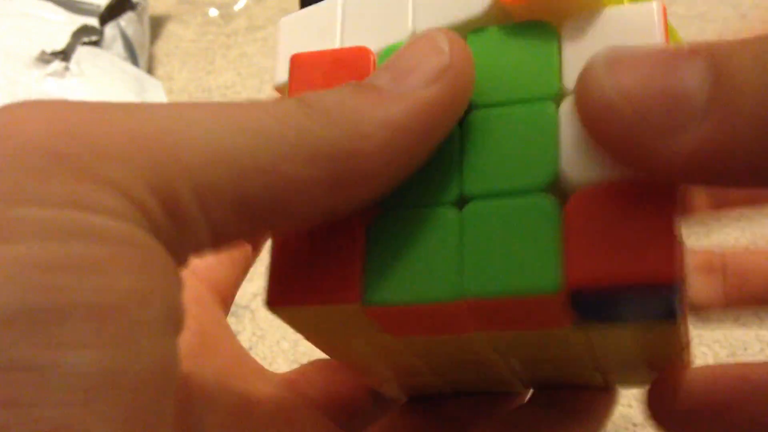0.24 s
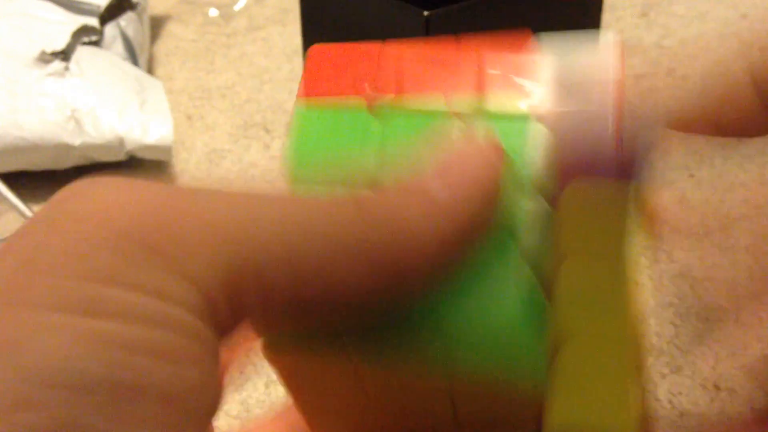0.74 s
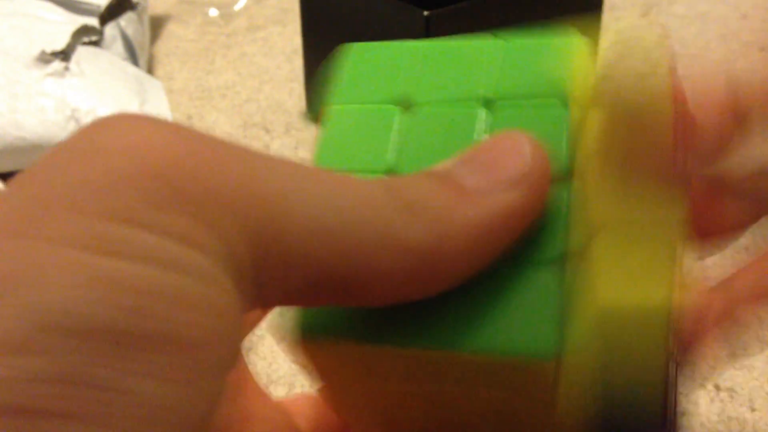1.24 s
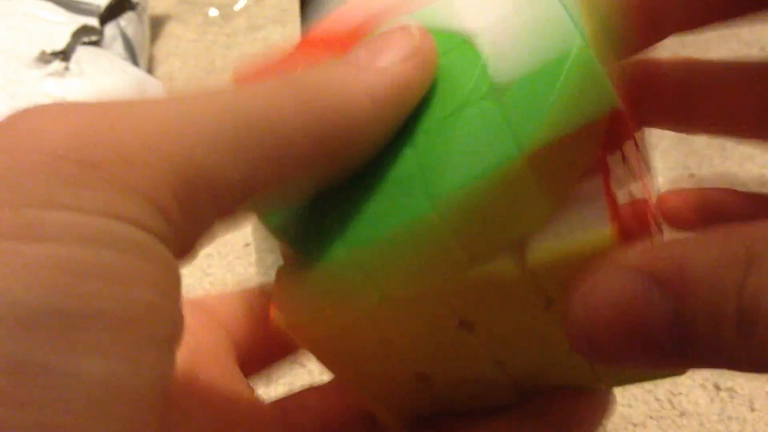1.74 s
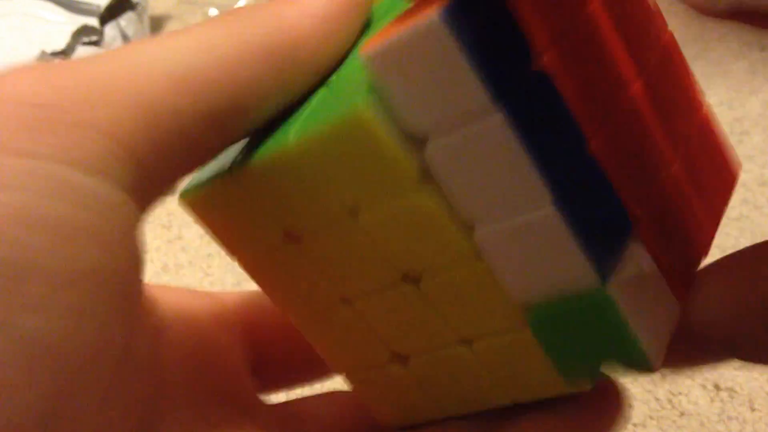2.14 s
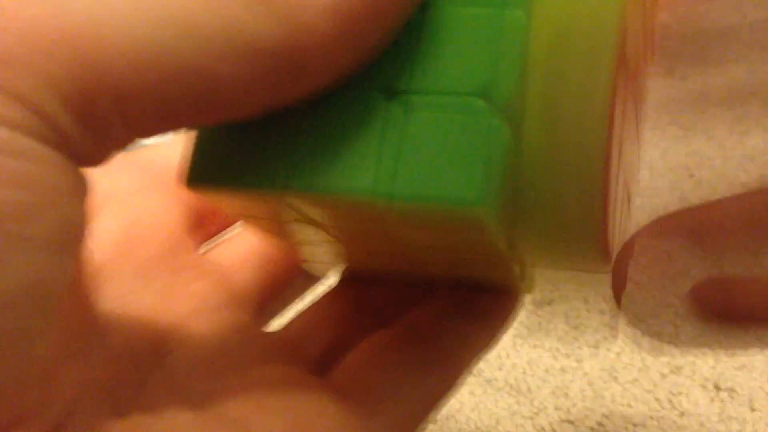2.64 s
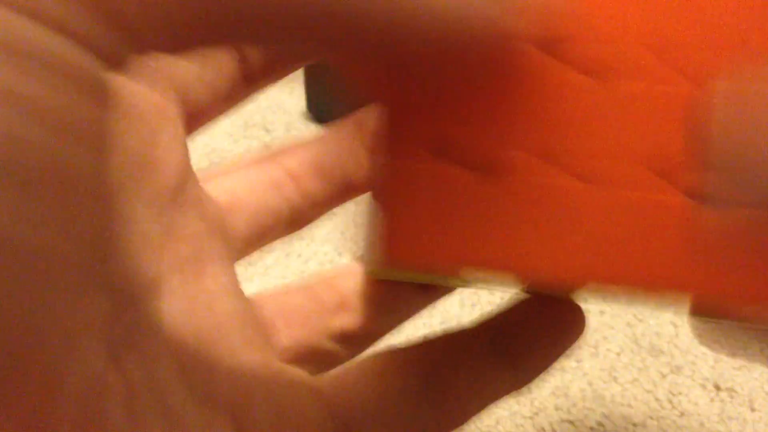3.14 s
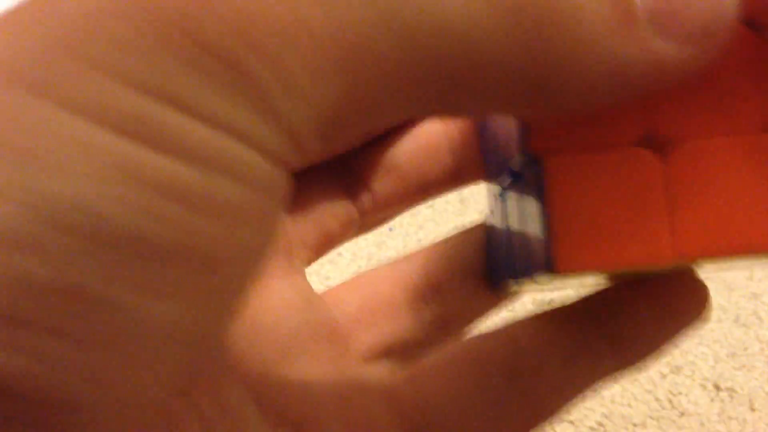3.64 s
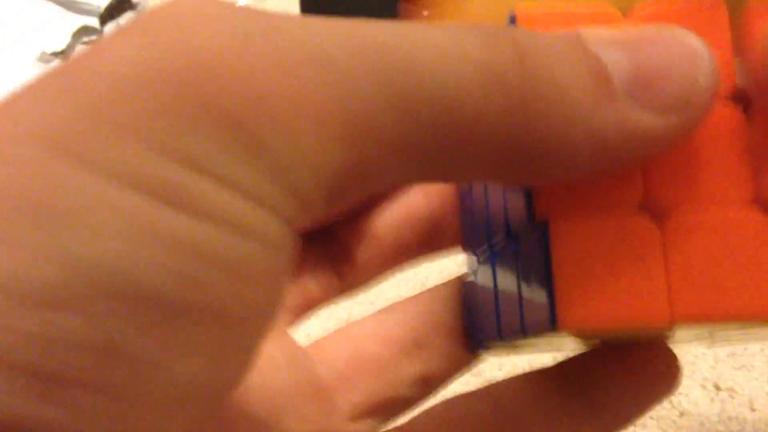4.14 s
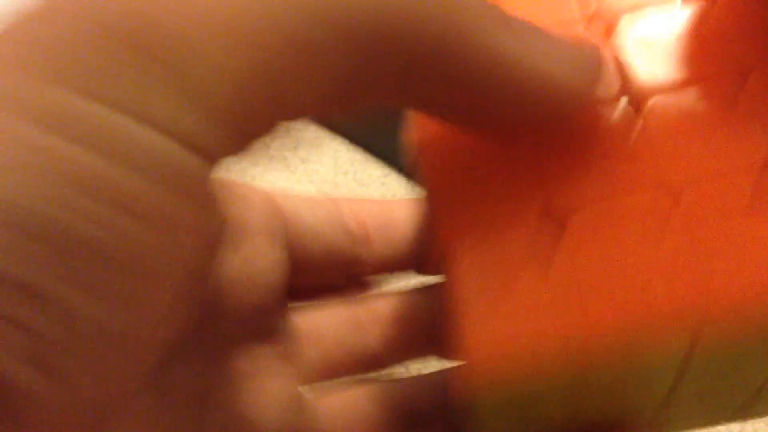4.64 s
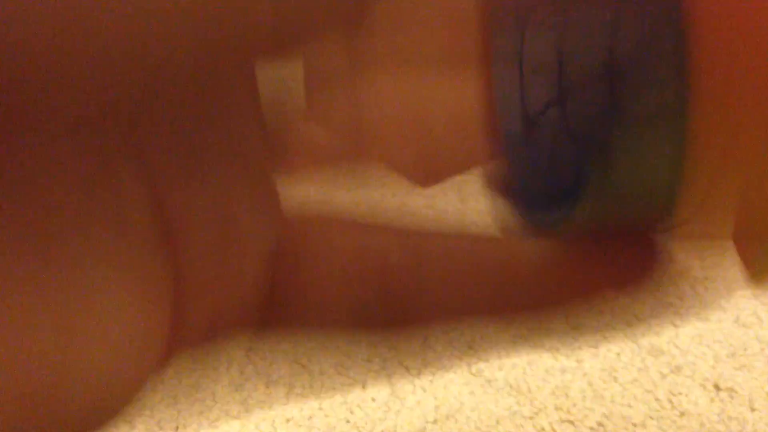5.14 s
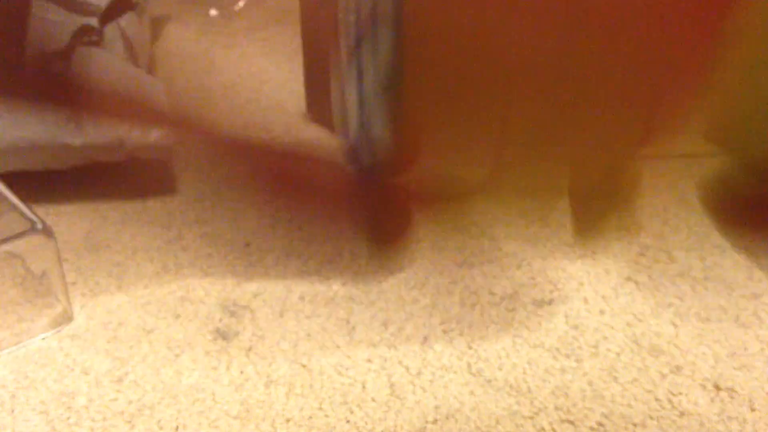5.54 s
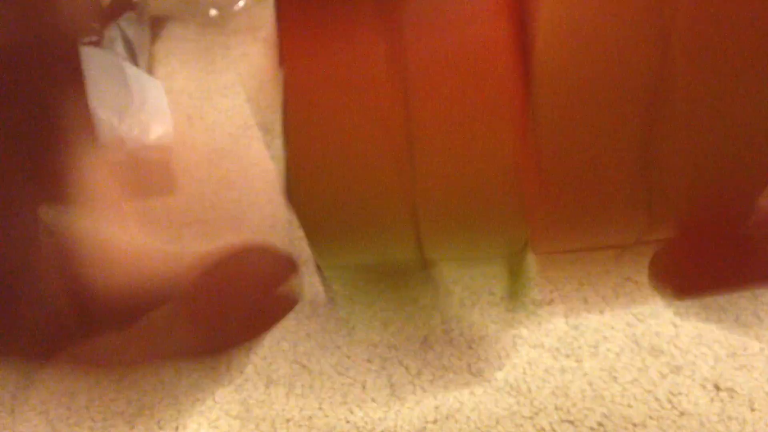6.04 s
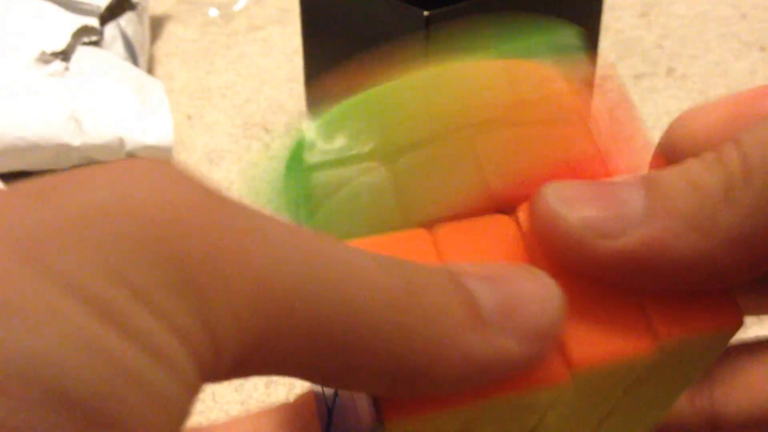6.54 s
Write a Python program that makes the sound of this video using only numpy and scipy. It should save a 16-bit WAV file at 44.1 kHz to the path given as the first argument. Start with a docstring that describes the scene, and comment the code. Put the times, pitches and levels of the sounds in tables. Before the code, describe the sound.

Dry, hollow clicks and short gritty rubs come from a handheld puzzle cube at close range. Quick irregular twists give way to near quiet, broken by a sharp snap and spaced turns. The turning then becomes heavy, crowded and loudest before easing into a few light clicks. The small indoor space adds little echo, only a very faint low hum, rumble and soft hiss.

```python
"""A plastic puzzle cube is twisted by hand close to the microphone in a carpeted room, for 6.8 seconds.
Brisk turns come first and thin out to faint nudges near 3 s; a hard snap at 3.4 s opens a run of spaced
turns, the loudest and densest turning fills 5.2 to 6.3 s, and a few small turns end the scene.
Each turn is friction noise through resonances, with clicks made of decaying shell modes and edge noise.
Throughout, a mains hum and two fan tones (wavering sines), rumble and hiss (shaped noise) lie underneath."""
import sys
import numpy as np
from scipy import signal
from scipy.fft import rfft, irfft, next_fast_len
from scipy.io import wavfile
from scipy.ndimage import map_coordinates

SR = 44100
rng = np.random.default_rng(int(sys.argv[2]) if len(sys.argv) > 2 else 0)


def log_audio(samples):
    """Write samples as a 16-bit WAV file to the path given in sys.argv[1]."""
    # one column per channel
    frames = np.atleast_2d(samples).T
    # limit to full scale, then quantise
    limited = np.clip(frames, -1, 1)
    pcm = np.round(limited * 32767).astype(np.int16)
    wavfile.write(sys.argv[1], SR, pcm)


N = 299859

# turns and nudges of a layer: (fastest moment [s], rise [s], fall [s], relative rubbing level [dB],
# relative brightness [dB], hollow pitch [Hz])
TURNS = [(0.049, 0.28, 0.043, -38, -6.5, 1930), (.21, 0.044, 0.042, -42, -7.5, 1820),
         (.335, 0.049, 0.05, -56.5, -7, 1800), (.38, 0.017, 0.014, -50.5, -8, 1730),
         (.408, .01, 0.014, -59, -12, 1800), (.435, 0.04, 0.027, -54, -8, 1830),
         (.487, 0.023, 0.036, -51, -8, 1580), (.57, 0.024, 0.016, -54.5, -13, 1800),
         (.61, 0.034, 0.037, -48, -5.5, 1890), (.662, 0.018, 0.022, -37.5, -9, 2000),
         (.7, 0.027, 0.038, -38, -6.5, 2050), (0.819, .11, 0.084, -37, -5, 1980),
         (0.949, 0.047, 0.085, -48, -11.5, 1874), (1.02, 0.043, 0.031, -54.5, -4, 1790),
         (1.085, 0.038, 0.045, -41, -6, 1970), (1.25, 0.062, 0.092, -49.5, -7.5, 1903),
         (1.317, 0.032, 0.022, -38.5, -4.5, 1880), (1.359, 0.03, 0.036, -46, -8, 1950),
         (1.441, 0.048, 0.048, -38, -4.5, 1890), (1.495, 0.025, 0.036, -43, -8.5, 1880),
         (1.781, 0.043, 0.039, -43, -8.5, 1752), (1.846, .02, 0.028, -45.5, -10.5, 1930),
         (1.911, 0.034, 0.019, -50.5, -8, 1814), (1.965, 0.015, 0.016, -39, -6, 2010),
         (2.03, 0.13, 0.081, -56.5, -10, 1720), (2.157, 0.057, 0.04, -47.5, -6, 1675),
         (2.32, 0.079, 0.078, -33, -6, 1807), (2.41, .02, 0.038, -48.5, -5, 1480),
         (2.705, 0.047, 0.05, -40, -10, 1850), (2.94, 0.072, 0.056, -57, -9, 1630),
         (3.15, 0.17, .14, -66, -11, 1420), (3.37, 0.047, 0.055, -53.5, -21, 1650),
         (3.43, 0.026, .04, -27, -2.5, 1790), (3.51, 0.025, .05, -59.5, -16, 1600),
         (3.64, 0.021, 0.025, -52.5, -14, 1488), (3.69, 0.03, 0.027, -39.5, -2.5, 1643),
         (3.81, .015, 0.018, -53, -3.5, 1650), (3.934, 0.046, 0.067, -37, -3.5, 1656),
         (4.095, 0.011, 0.018, -49.5, -7, 1600), (4.203, 0.042, 0.053, -34.5, -1.5, 1610),
         (4.356, 0.014, .02, -53.5, -7, 1610), (4.47, 0.046, 0.061, -33.5, -3, 1783),
         (4.63, 0.014, 0.035, -57.5, -1, 1460), (4.95, 0.085, 0.082, -44, -6.5, 1826),
         (5.04, 0.078, .06, -54, -7, 1700), (5.23, .11, 0.087, -34, -8.5, 1605),
         (5.3, .03, .025, -49, -8, 1565), (5.441, 0.066, 0.084, -28, -7, 1503),
         (5.652, .1, 0.05, -29, -5.5, 1487), (5.781, 0.073, 0.064, -27.5, -8.5, 1495),
         (5.87, 0.032, 0.029, -32.5, -2, 1520), (5.93, 0.057, 0.037, -26.5, -1.5, 1531),
         (6.045, 0.074, .04, -31.5, -5.5, 1563), (6.125, 0.032, 0.052, -30, -3, 1715),
         (6.175, 0.028, .025, -41, -4, 1610), (6.254, 0.044, .05, -38, -4.5, 1834),
         (6.53, 0.033, .03, -46, -7, 1948), (6.575, 0.048, 0.028, -42.5, -6.5, 1965),
         (6.635, 0.049, 0.031, -38, -4.5, 2020), (6.73, 0.037, 0.053, -55.5, -3.5, 1854)]
# clearest knocks of the pieces: (time [s], relative peak level [dB], edge crack relative to the ring [dB])
CLEAR_KNOCKS = [(0.01, -32, -7), (0.0537, -17.5, -18), (0.0697, -22, -21), (0.187, -26.5, -16),
                (0.2075, -29, -8), (0.2309, -29, -19), (0.3152, -38, -16), (0.381, -30.5, -21),
                (0.4299, -33, -18), (0.4828, -32, -14), (0.5132, -35.5, -17), (0.5663, -44, -15),
                (0.5955, -38, -20), (0.605, -20.5, -24), (0.633, -22, -19), (0.6537, -30.5, -11),
                (0.6929, -17, -9.5), (0.7068, -19, -24), (0.741, -28, -19), (0.7612, -25, -20),
                (0.7735, -21, -17), (0.7896, -20.5, -16), (0.8152, -22, -23), (0.828, -21, -18),
                (0.8415, -20.5, -15), (0.8547, -23.5, -14), (0.8673, -23.5, -12), (0.9333, -29.5, -23),
                (0.9846, -21, -15), (1.068, -23.5, -16), (1.0853, -28, -14), (1.1114, -30, -9),
                (1.1645, -40.5, -15), (1.2184, -31.5, -14.5), (1.2627, -25.5, -20.5), (1.3139, -14, -31),
                (1.4027, -24.5, -17), (1.4247, -32, -12), (1.4315, -32, -20), (1.4361, -22.5, -19),
                (1.4516, -21.5, -16), (1.4964, -35, -26), (1.5224, -32, -14), (1.7347, -37.5, -12.5),
                (1.7641, -30.5, -11), (1.7834, -26.5, -10.5), (1.8432, -28, -8), (1.9555, -26, -19),
                (1.9639, -23.5, -11.5), (2.0654, -35, -28), (2.1204, -30, -16.5), (2.2557, -23.5, -27),
                (2.276, -21, -24), (2.3017, -12.5, -9), (2.3104, -10.5, -7), (2.3236, -11, -7),
                (2.3284, -12.5, -6), (2.3401, -13, -11), (2.354, -19, -12), (2.36, -18, -15),
                (2.413, -27.5, -12), (2.4824, -41, -26), (2.679, -29, -17), (2.7062, -8.5, -15),
                (2.7392, -32, -13.5), (2.8927, -44, -14), (2.9494, -35, -19), (3.053, -42.5, -18),
                (3.1117, -39, -24), (3.1764, -40.5, -17), (3.209, -41, -14.5), (3.2992, -30.5, -26),
                (3.3568, -43, -18), (3.3616, -34, -24), (3.3853, -32, -21), (3.4123, -22.5, 2),
                (3.4189, -9.5, -9), (3.4242, -12, -9), (3.4362, -6.5, -10.5), (3.4584, -30, -15),
                (3.63, -41, -16), (3.663, -22, -18.5), (3.6923, -21.5, -16), (3.7768, -44, -27),
                (3.8005, -36.5, -18), (3.8843, -28.5, -15), (3.9004, -32, -11), (3.909, -25, -6),
                (3.9428, -17.5, -6.5), (3.9612, -31, -3), (4.0828, -32.5, -9), (4.0921, -29.5, -21),
                (4.1602, -25, -12), (4.1756, -22.5, -12), (4.1877, -20.5, -8.5), (4.2247, -23.5, -2.5),
                (4.2617, -29.5, -19), (4.345, -27.5, -15.5), (4.3666, -41, -9), (4.4233, -20.5, -9.5),
                (4.4506, -18, -2), (4.4624, -17.5, -8), (4.4743, -15, -6.5), (4.5145, -22, -14),
                (4.6173, -39, -11), (4.625, -32.5, -9.5), (4.7172, -35, -28), (4.7257, -33, -8.5),
                (4.819, -44, -20), (4.8778, -42, -19), (4.8978, -36, -17), (4.9208, -35, -21),
                (4.9386, -27, -24), (4.9659, -29.5, -12), (4.98, -32, -26), (5.0344, -33, -18),
                (5.1133, -36.5, -25), (5.133, -32.5, -23), (5.1511, -19, -23), (5.1693, -24, -28),
                (5.1944, -21, -19), (5.215, -20, -15.5), (5.257, -16.5, -17), (5.2751, -25, -18),
                (5.3549, -27.5, -9), (5.3654, -30, -10), (5.3856, -19, -16), (5.4006, -13.5, -22),
                (5.421, -20, -13), (5.4334, -23, -16), (5.459, -25, -11), (5.474, -18, -13),
                (5.5073, -19, -8.5), (5.5607, -36, -32), (5.5895, -17.5, -25), (5.5942, -15.5, -23),
                (5.6122, -20.5, -21), (5.6246, -15.5, -20), (5.6445, -11.5, -11), (5.659, -4.5, -12.5),
                (5.6727, -14.5, -9), (5.7114, -26, -16), (5.7251, -25, -13), (5.7287, -19.5, -17),
                (5.7478, -21, -10), (5.7603, -20, -6), (5.7667, -13.5, -12), (5.781, -8, -18),
                (5.7958, -17.5, -7), (5.8054, -19, -14), (5.826, -17, -8.5), (5.8541, -22, -10),
                (5.8737, -15, -12), (5.9005, -12, -12), (5.913, -11, -7.5), (5.934, -7.5, -11),
                (5.9424, -19, -14), (5.9477, -14.5, -6), (5.9906, -22, -12), (6.0258, -22, -5),
                (6.0439, -16, -20), (6.065, -17, -15), (6.11, -11.5, -11), (6.1292, -8.5, -15.5),
                (6.1454, -20, -15), (6.157, -22.5, -11), (6.1704, -19.5, -15), (6.2184, -25, -14),
                (6.2339, -22, -14), (6.2464, -20.5, -16), (6.2623, -26, -18), (6.5096, -39, -23),
                (6.57, -28, -9.5), (6.6209, -27, -23), (6.6462, -25, -16), (6.6842, -37, -19),
                (6.7311, -26, -9)]
# shell modes of a hollow piece: (ratio to the hollow pitch [1], relative level [dB], decay time t60 [s])
SHELL_MODES = [(.62, -12, 0.011), (.8, -12, 0.01), (1, -4, 0.013), (1.18, -10, 0.015), (1.5, -9.5, 0.015),
               (2, -15, 0.011)]
# colour of the hard edges through the microphone port: (frequency [Hz], relative level [dB])
EDGE_COLOUR = [(1760, -27), (3000, -4.5), (3940, -10), (4250, -6.5), (5140, -4), (6480, 0.5), (9490, -11.5),
               (10200, -16), (14600, -8), (15300, -11)]
# resonances of the whole cube cupped in the palms: (frequency [Hz], width [Hz], relative level [dB])
CUPPED_MODES = [(840, 110, -7.5), (1405, 180, -3), (2140, 236, -6.5), (3100, 840, -13)]
# resonances of the cube held by the fingertips: (frequency [Hz], width [Hz], relative level [dB])
OPEN_MODES = [(826, 377, -5.5), (1550, 143, 0.5), (2172, 113, 3), (2870, 550, -5.5)]
# weak bass of so small an object, and the octave favoured by the gap between the hands:
# (frequency [Hz], gain [dB])
HANDS_GAIN = [(60, -41), (200, -11), (350, -1.5), (600, -4), (800, -5), (1080, -3), (1250, -0.5),
              (2300, -2.5), (2600, -5.5), (4000, -2), (5000, -1)]
# decay of the carpeted room: (frequency [Hz], decay time t60 [s])
ROOM_DECAY = [(300, 0.71), (2000, 0.14), (10000, 0.3)]
# mains hum and two fan tones: (frequency [Hz], rms level [dB], wavering [dB])
HUM_TONES = [(121, -68.5, .5), (266.4, -70.5, 3), (780, -78, 1.5)]
# colour of the low rumble: (frequency [Hz], relative level [dB])
RUMBLE_COLOUR = [(25, -24), (60, 1), (80, 0.5), (160, 2), (250, 2.5), (300, -13), (400, -47)]
# colour of the room hiss: (frequency [Hz], relative level [dB])
HISS_COLOUR = [(200, -24), (300, -6.5), (420, -8), (600, -8), (720, -12.5), (900, -8.5), (1200, -8),
               (1600, -18), (2400, -9), (3300, -15.5), (6000, -22.5), (9800, -34), (15300, -22.5)]
# low-end roll-off and steep upper band limit: (frequency [Hz], gain [dB])
BAND_GAIN = [(20, -21), (50, -11), (70, -7.5), (110, 2), (15270, 0), (15340, -25), (16400, -37)]
TOP_HZ = 16480  # nothing passes from here up

# arc of a turn: drop at one rise or fall time from the fastest moment, exponents of the arc's two sides
FADE_DB, START_ROUNDNESS, STOP_ROUNDNESS = 25, 2.54, 3.62  # the layer stops more squarely
SETTLE_DB, SETTLE_DB_PER_S = -21, 257  # pieces settle after a turn: level relative to it, rate of decay
REST_DB = -71  # rubbing at rest, on the scale of the turns

RATTLE_GAP_S = 0.005  # median time between small knocks of the loose pieces
RATTLE_DB, RATTLE_SPREAD_DB = 8, 6  # knock level over the rubbing, and its scatter
RATTLE_CRACK_DB, CRACK_SPREAD_DB = -11, 5  # edge crack over the turn's brightness, and its scatter
PITCH_SPREAD = 0.12  # largest relative shift of a knock's pitch
CLEAR_S = 0.0035  # no rattle so close to a clear knock or its touch
TOUCH_S, TOUCH_DB = 0.0022, -10  # median lead of a corner's light touch, its mean level under the knock

# the top of the scrape gains an extra 0.35 dB per dB of brightness above the usual
SHEEN_HZ, SHEEN_GROWS, USUAL_BRIGHT_DB = 9050, 0.35, -5.5


def turning():
    """Hand motion as a control signal: each turn swells and fades in an arc; where turns overlap, powers add.

    Returns rubbing level [dB], brightness [dB] and hollow pitch [Hz] at every sample."""
    t = np.arange(0, N + 64, 64) / SR  # a coarse grid is enough for a hand
    fastest, rise, fall, db, bright_db, hz = np.transpose(TURNS)[:, :, None]
    before = t < fastest
    away = np.where(before, (fastest - t) / rise, (t - fastest) / fall)
    arc_db = db - FADE_DB * away ** np.where(before, START_ROUNDNESS, STOP_ROUNDNESS)
    settle_db = db + SETTLE_DB - SETTLE_DB_PER_S * np.maximum(t - fastest - fall, 0)
    power = amp(arc_db) ** 2 + (t > fastest) * amp(settle_db) ** 2
    # brightness and pitch are means weighted by power; the small term decides between turns
    share = power + 1e-9 / (1 + away) ** 4
    share = share / share.sum(0)
    level_db = 10 * np.log10(power.sum(0) + amp(REST_DB) ** 2)
    curves = level_db, (share * bright_db).sum(0), (share * hz).sum(0)
    return [np.interp(np.arange(N) / SR, t, curve) for curve in curves]


def rubbing(level_db, bright_db, hz, slips_per_s=500, spread_db=5.0, smooth=0.76):
    """Stick-slip friction: tiny slips between the layers, in clumps, excite the cube and its edges."""
    slips = (rng.random(N) < slips_per_s / SR) * amp(spread_db * rng.standard_normal(N))
    slip_decay = amp(-60 * np.arange(SR // 100) / SR / 0.0098)
    burst = signal.fftconvolve(slips, slip_decay)[:N]
    drag = unit((smooth + unit(burst)) * amp(1.82 * wobble(70)))
    body_drive, edge_drive = drag * rng.standard_normal((2, N))
    # the grip that raises the pitch of the knocks also opens the sound of the whole cube
    openness = np.clip((hz - 1500) / 500, 0, 1)
    cupped = np.sqrt(1 - openness) * resonant(body_drive, CUPPED_MODES)
    opened = np.sqrt(openness) * resonant(body_drive, OPEN_MODES)
    edge = signal.fftconvolve(edge_drive, causal(EDGE_COLOUR))[:N]
    sheen = filtered(edge, lambda f: f > SHEEN_HZ)
    sheen_gain = amp(SHEEN_GROWS * (bright_db - USUAL_BRIGHT_DB))
    edge = (edge + sheen * (sheen_gain - 1)) * amp(bright_db + 1.14)
    return amp(level_db - 4.0) * (cupped + opened + edge)


def knocks(level_db, bright_db, hz):
    """Impacts as a point process: clear knocks, their first touches and a rattle that follows the turns.

    Returns rows of (time [s], relative peak level [dB], hollow pitch [Hz], relative edge crack [dB])."""
    gap, size, edge = rng.standard_normal((2000, 3)).T
    clear_s, clear_db, clear_crack_db = np.transpose(CLEAR_KNOCKS)
    # a corner touches lightly just before each clear knock
    early, soft = rng.standard_normal((len(clear_s), 2)).T
    clear_s = np.append(clear_s, clear_s - TOUCH_S * np.exp(0.3 * early))
    clear_db = np.append(clear_db, clear_db + TOUCH_DB + 3 * soft)
    clear_crack_db = np.tile(clear_crack_db, 2)

    rattle_s = np.cumsum(np.exp(0.4 * gap)) * RATTLE_GAP_S
    nearest_s = np.abs(rattle_s[:, None] - clear_s).min(axis=1)
    keep = (rattle_s < N / SR) & (nearest_s > CLEAR_S)
    at = (rattle_s[keep] * SR).astype(int)
    rattle_db = level_db[at] + RATTLE_DB + RATTLE_SPREAD_DB * np.clip(size[keep], -3, 0.9)
    rattle_crack_db = bright_db[at] + RATTLE_CRACK_DB + CRACK_SPREAD_DB * edge[keep]

    s = np.append(clear_s, rattle_s[keep])
    db = np.append(clear_db, rattle_db)
    crack_db = np.append(clear_crack_db, rattle_crack_db)
    detune = PITCH_SPREAD * np.tanh(rng.standard_normal(len(s)))
    pitch = hz[(s * SR).astype(int)] * (1 + detune)
    return np.transpose([s, db, pitch, crack_db])


def clicks(hits):
    """Modal impact: each knock rings the hollow piece in damped modes and cracks at its edge as noise."""
    s, db, hz, crack_db = np.transpose(hits)[:, :, None]
    t = np.arange(SR // 40) / SR
    chance = rng.standard_normal((len(s), len(t) + 3 * len(SHELL_MODES)))
    ring = 0
    for k, (ratio, mode_db, t60) in enumerate(SHELL_MODES):
        detune, strength, phase = (chance[:, [3 * k + j]] for j in range(3))
        swing = np.sin(2 * np.pi * hz * ratio * (1 + 0.066 * detune) * t + 2 * phase)
        ring = ring + amp(mode_db + 3.74 * strength - 60 * t / t60) * swing
    ring = ring * (1 - np.exp(-t / 0.00033)) ** 2  # the contact builds up over a fraction of a millisecond
    # the edge chatters for a few milliseconds after first contact, with a weaker, longer tail
    decay = amp(-60 * t / 0.0022) + 0.37 * amp(-60 * t / 0.022)
    chatter = decay * (1 - np.exp(-t / 0.000094)) * chance[:, -len(t):]
    # sharper corners crack brighter, blunter ones duller
    bluntness = np.tanh(chance[:, [0]] - 0.12 * (crack_db + 9))
    chatter[:, 1:] += 0.46 * bluntness * chatter[:, :-1]
    crack = signal.fftconvolve(chatter, causal(EDGE_COLOUR)[None], axes=1)[:, :len(t)]
    rows = amp(db - 4.0) * peak_one(ring) + amp(db + crack_db + 7.0) * peak_one(crack)
    return placed(s[:, 0], rows)


def thumps(hits):
    """Damped oscillation: knocks jolt the hands, which answer with a dull low push."""
    s, db, _, _ = np.transpose(hits)[:, :, None]
    t = np.arange(SR // 20) / SR
    pitch, strength = rng.standard_normal((len(s), 2)).T[:, :, None]
    swing = np.sin(2 * np.pi * 260 * (1 + 0.19 * np.tanh(pitch)) * t)
    push = swing * amp(-60 * t / 0.029) * (1 - np.exp(-t / 0.00068))
    return placed(s[:, 0], amp(0.73 * db - 38 + 1.9 * strength) * push)


def room(x):
    """Reverberation: a short, soft noise tail in which each frequency decays at its own speed."""
    hz, t, bins = signal.stft(rng.standard_normal(SR // 3), SR, nperseg=256)
    decay = amp(-60 * t / along(ROOM_DECAY, hz)[:, None])
    tail = signal.istft(bins * decay, SR, nperseg=256)[1]
    delayed = np.pad(x, (250, 0))  # samples before the tail begins
    return signal.fftconvolve(delayed, tail / np.linalg.norm(tail))[:N]


def background():
    """Stationary sources: tones unsteady in level and phase, over coloured noise as rumble and hiss."""
    t = np.arange(N) / SR
    tones = 0
    for hz, db, waver_db in HUM_TONES:
        level = np.sqrt(2) * amp(db + waver_db * wobble(16))
        tones = tones + level * np.sin(2 * np.pi * hz * t + 0.69 * waver_db * wobble(13))
    rumble = unit(filtered(rng.standard_normal(N), lambda hz: amp(along(RUMBLE_COLOUR, hz))))
    hiss = unit(filtered(rng.standard_normal(N), lambda hz: amp(along(HISS_COLOUR, hz))))
    return tones + amp(-70.5) * rumble + amp(-66.5) * hiss


def amp(db):
    """Decibel law: amplitude ratio of a level."""
    return 10 ** (np.asarray(db) / 20)


def unit(x):
    """Normalisation by energy: x at rms 1."""
    return x / np.sqrt(np.mean(x ** 2) + 1e-20)


def peak_one(rows):
    """Normalisation by peak: each row scaled to a peak of 1."""
    return rows / np.abs(rows).max(axis=1, keepdims=True)


def along(points, hz):
    """Interpolation of (frequency [Hz], value) points on a logarithmic frequency axis."""
    f, v = np.transpose(points)
    return np.interp(np.log(hz + 1), np.log(f + 1), v)


def wobble(rate):
    """Spline interpolation of noise: a smooth random curve, rate knots a second."""
    knots = rng.standard_normal(int(N * rate / SR) + 4)
    return map_coordinates(knots, [np.arange(N) * rate / SR])


def filtered(x, response):
    """Linear filtering: the spectrum of x times a complex response of frequency."""
    m = next_fast_len(N + SR // 2)
    return irfft(rfft(x, m) * response(np.fft.rfftfreq(m, 1 / SR)), m)[:N]


def resonant(x, modes):
    """Parallel resonance: x through band-pass modes of alternating sign, rms 1."""
    def response(f):
        total = 0
        for k, (centre, width, db) in enumerate(modes):
            damping = 1j * f * width
            total = total + (-1) ** k * amp(db) * damping / (centre * centre - f * f + damping)
        return total
    return unit(filtered(x, response))


def causal(points):
    """Minimum phase by cepstral folding: a unit-energy pulse coloured by (frequency [Hz], level [dB])."""
    size = 2048
    magnitude = amp(along(points, np.fft.rfftfreq(size, 1 / SR)))
    cepstrum = irfft(np.log(np.maximum(magnitude, 1e-4)))
    cepstrum[1:size // 2] *= 2
    cepstrum[size // 2 + 1:] = 0
    pulse = irfft(np.exp(rfft(cepstrum)))[:size // 2]
    return pulse / np.linalg.norm(pulse)


def placed(seconds, rows):
    """Superposition: short sounds, one per row, summed at their times."""
    at = np.round(seconds * SR).astype(int)[:, None] + np.arange(rows.shape[1])
    return np.bincount(at.ravel(), rows.ravel(), N + SR)[:N]


def scene():
    """Superposition of direct sound, reverberation and background."""
    turns = turning()
    hits = knocks(*turns)
    plastic = clicks(hits) + rubbing(*turns)
    radiated = filtered(plastic, lambda hz: amp(along(HANDS_GAIN, hz)))
    cube = radiated + thumps(hits)
    return (cube + amp(-23.5) * room(cube) + background())[None]


def record(dry):
    """Band limitation: the bass rolls off and the treble is cut steeply near 15.3 kHz."""
    return filtered(dry[0], lambda hz: amp(along(BAND_GAIN, hz)) * (hz < TOP_HZ))[None]


dry = scene()
out = record(dry)
log_audio(out)
```